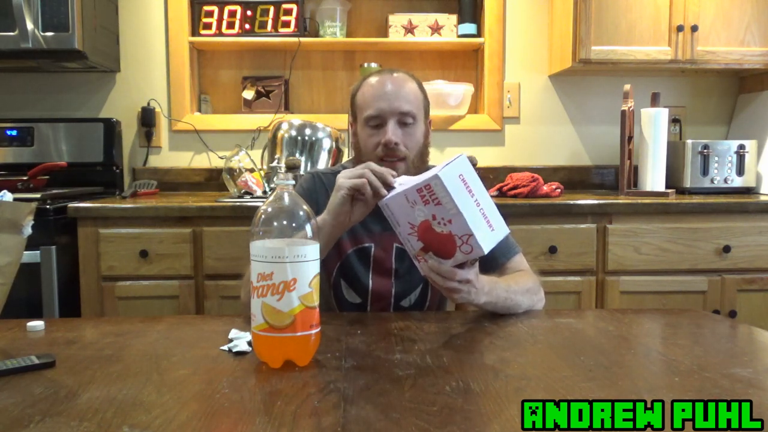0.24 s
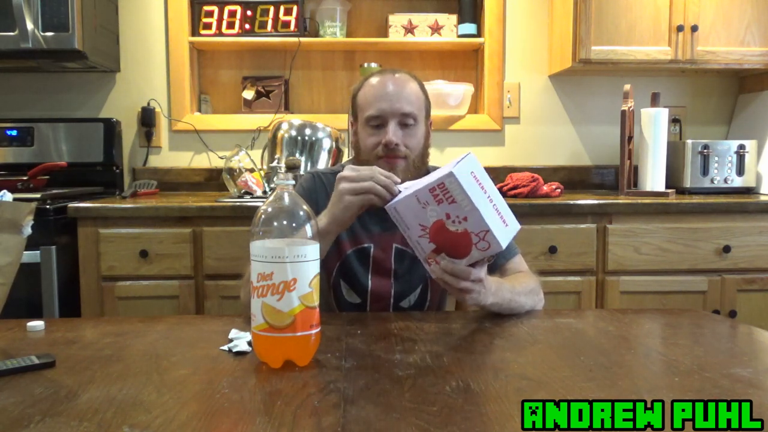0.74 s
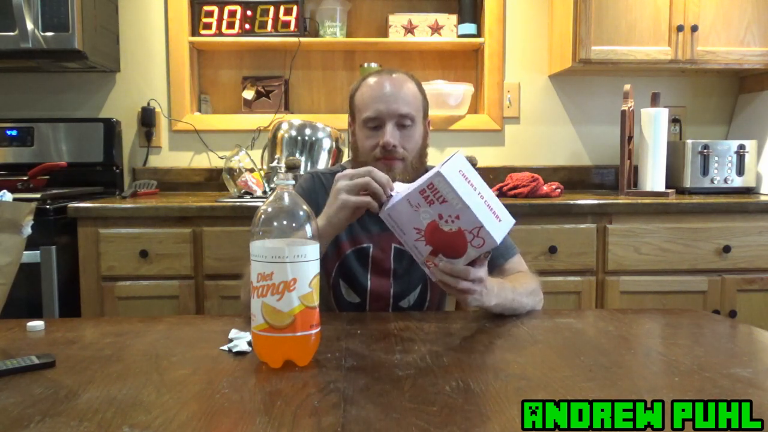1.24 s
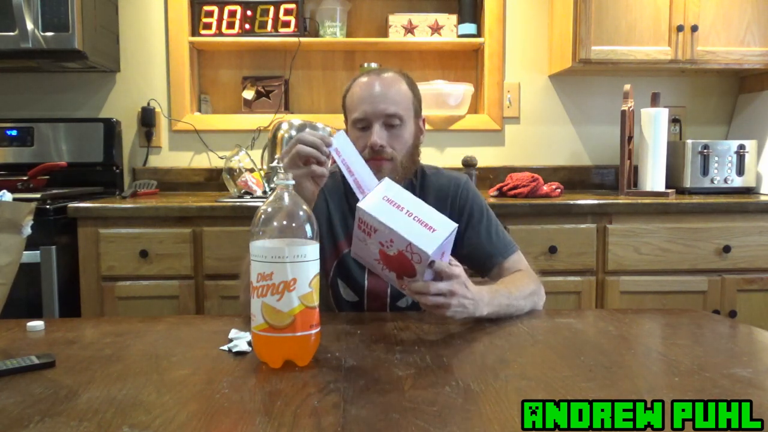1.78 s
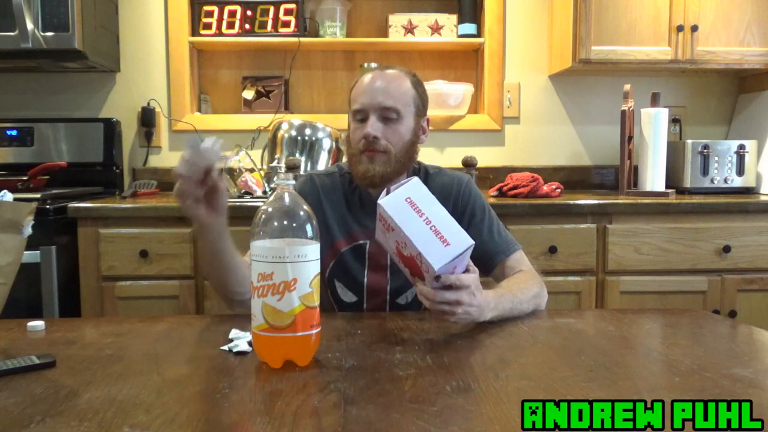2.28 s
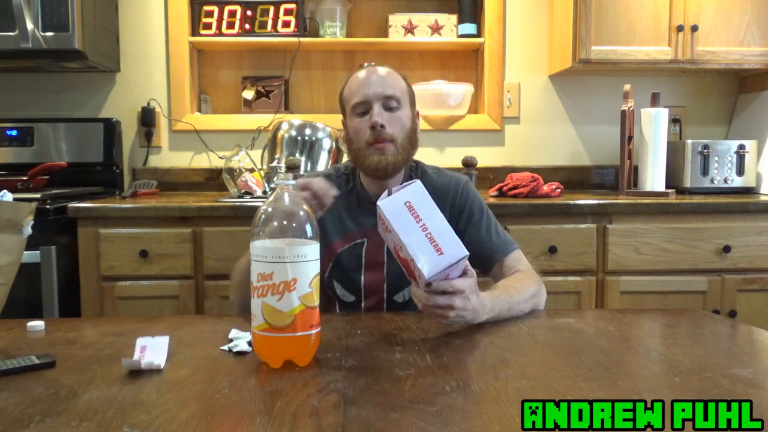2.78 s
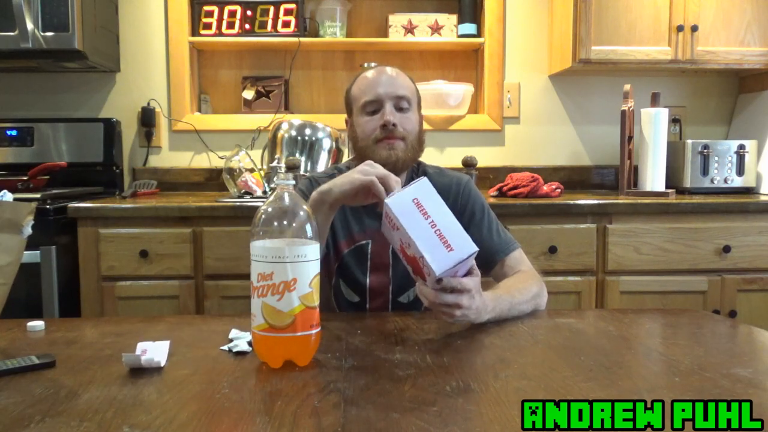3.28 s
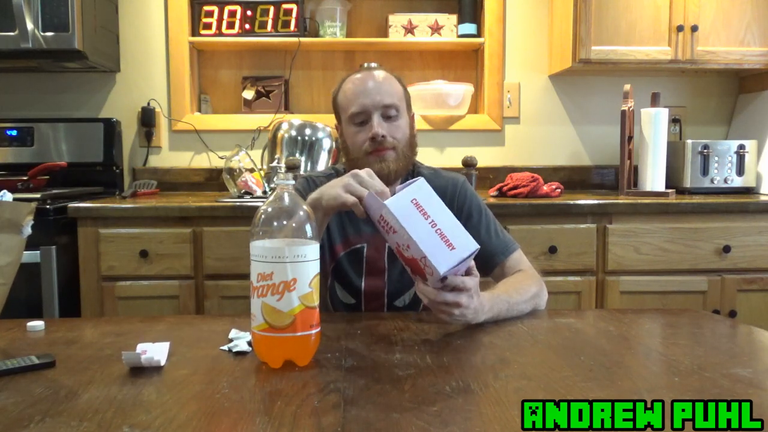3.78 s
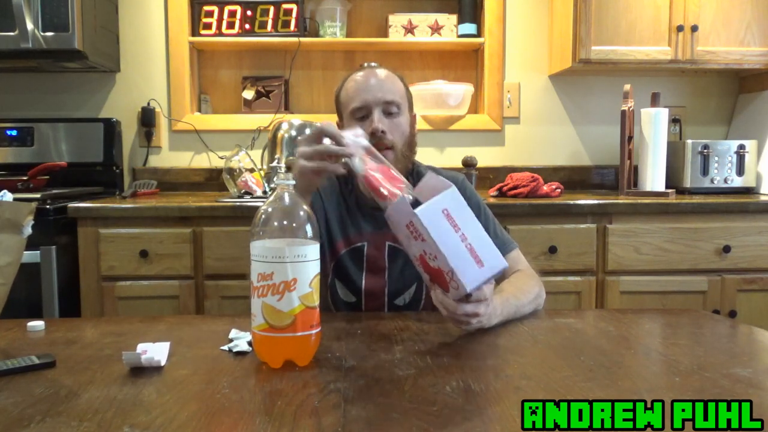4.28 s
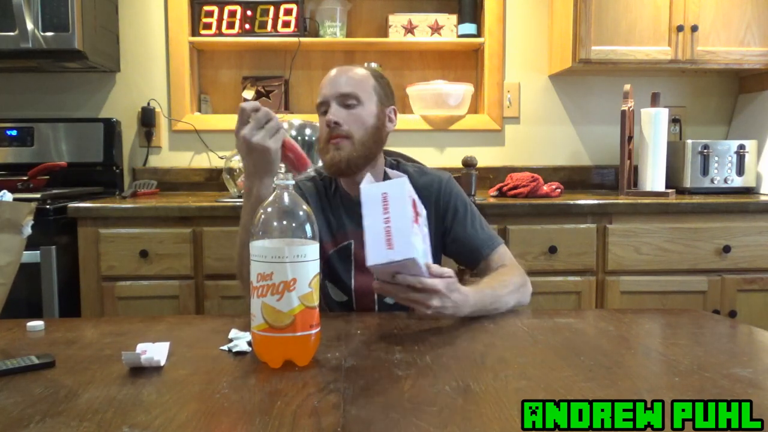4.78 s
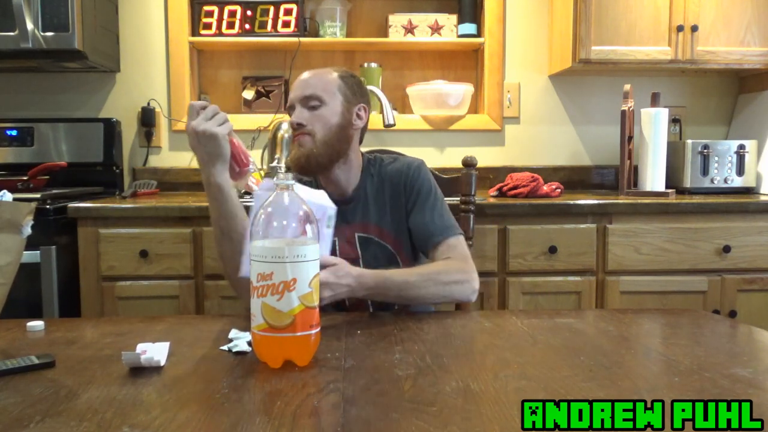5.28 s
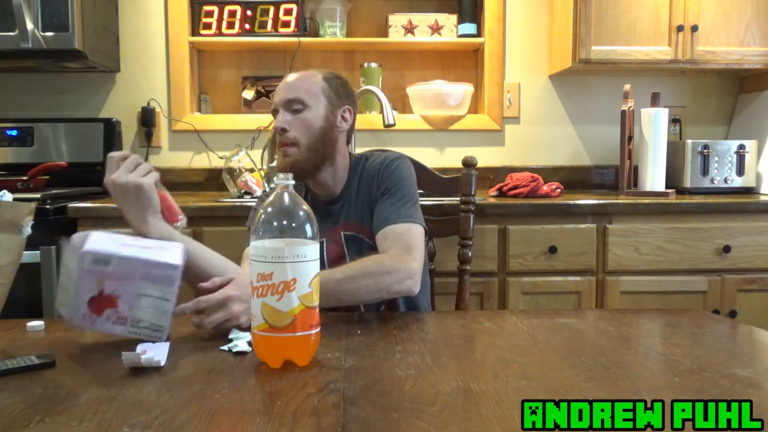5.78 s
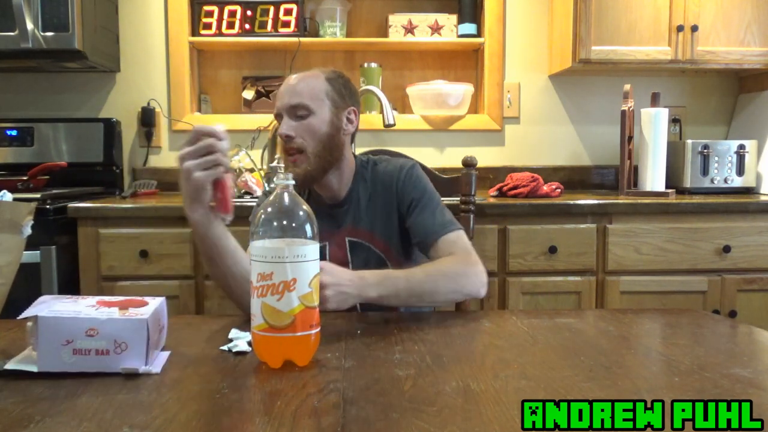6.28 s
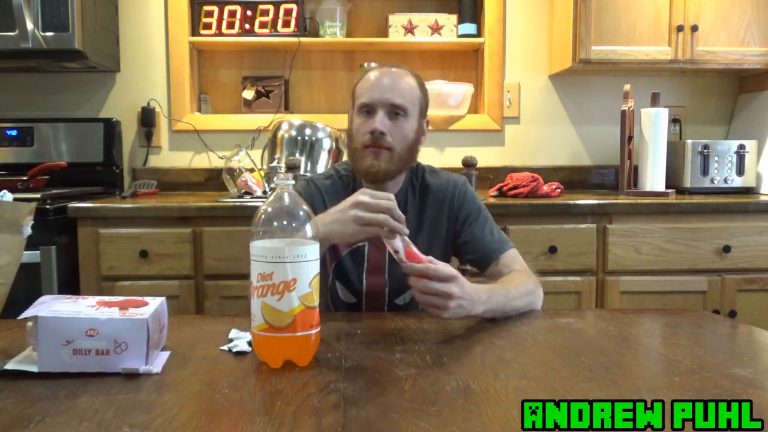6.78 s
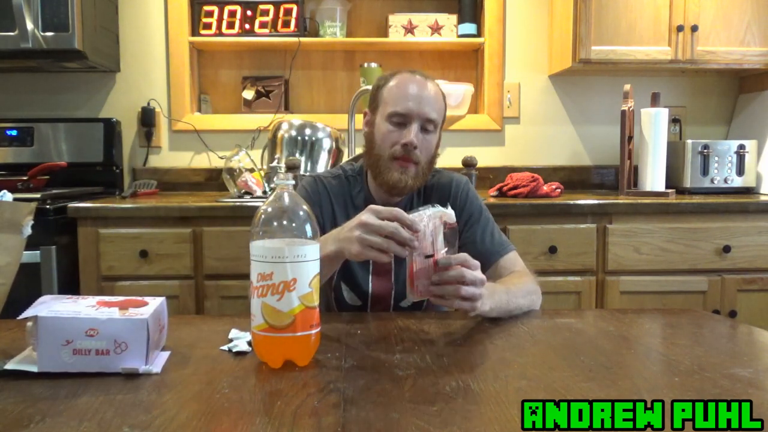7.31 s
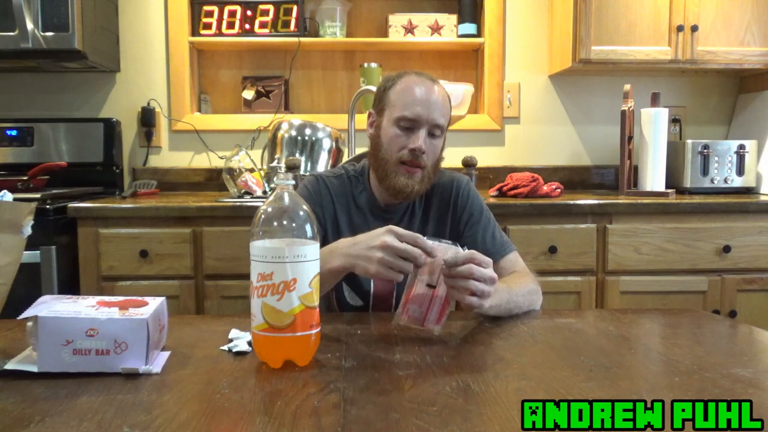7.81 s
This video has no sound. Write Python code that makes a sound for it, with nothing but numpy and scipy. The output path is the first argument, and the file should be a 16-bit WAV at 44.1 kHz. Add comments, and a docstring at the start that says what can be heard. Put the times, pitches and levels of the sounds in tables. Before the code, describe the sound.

In a small hard kitchen, fingers scratch at a hollow cardboard box; a tab snaps woodily, then a tear strip rips away in rapid pops and rasping fibres. After a quiet pause a thin plastic wrapper slides out crackling. The box knocks and rattles onto the table slightly left, then the wrapper crinkles briskly until the end. Close, nearly mono microphone, low steady murmur beneath.

```python
"""A thin plastic wrapper crinkles in the fingers: squeezes swell a shower of small folds, big creases snap.
Before that a cardboard box is picked at: a tab snaps, then its perforated tear strip rips off with hollow
pops and rasping fibres. Later the box lands on the table as the wrapper goes on crinkling. Noise bursts
make the cracks, struck modes the panels and table, dense random fractures the friction and folds.
A small hard room answers, nearly mono, over a steady murmur."""
import sys
import numpy as np
from scipy import signal
from scipy.fft import rfft, irfft, next_fast_len
from scipy.io import wavfile
from scipy.ndimage import uniform_filter1d, minimum_filter1d

SR = 44100
rng = np.random.default_rng(int(sys.argv[2]) if len(sys.argv) > 2 else 0)


def to_wav(s):
    """Save 16-bit WAV."""
    ch = np.atleast_2d(s).T  # columns
    pcm = np.round(np.clip(ch, -1, 1) * 32767)  # PCM
    wavfile.write(sys.argv[1], SR, pcm.astype(np.int16))


N = 355005

# big creases of the wrapper snapping through: (t/s, relative level/dB)
CREASE_SNAPS = [(3.8057, -19), (3.874, -18), (3.903, -14), (3.9203, -12.5), (4.0669, -12), (4.2818, 4.5),
                (4.3515, -3), (4.4256, -9.5), (4.4712, -5.5), (4.4973, -10), (4.5104, -9), (4.5517, -2.5),
                (4.5842, -8.5), (4.629, -10), (4.6467, -8), (4.655, -7), (4.6823, -7.5), (4.763, -10.5),
                (4.771, -12.5), (4.9222, -8.5), (4.975, -19), (5.3226, -23), (6.4665, -17), (6.595, -11),
                (6.612, -13.5), (6.6266, -5.5), (6.6567, -9.5), (6.6818, -5), (6.714, -14), (6.7629, -11),
                (6.7821, -6), (6.8079, -10), (6.8486, -5), (6.8782, -11), (6.891, -14), (6.8982, -6.5),
                (6.9648, -9.5), (6.976, -19), (6.991, -13), (7.055, -10), (7.105, -17), (7.2803, -16.5),
                (7.3554, -2.5), (7.3796, -11.5), (7.441, -7.5), (7.4775, -9.5), (7.5208, -4), (7.6126, -17),
                (7.653, -17), (7.6858, -8.5), (7.7888, -9.5), (7.836, -8.5), (7.9243, -6), (7.9508, -7.5),
                (7.9706, -8.5)]
# colour of the hollow box: (f/Hz, gain/dB)
HOLLOW_COLOUR = [(35, -44), (80, -28), (160, -20), (280, -12), (480, -8.5), (700, -3), (900, -7.5),
                 (1300, -9.5), (2300, -11), (4000, -59)]
# colour of cracking and rasping paper fibres: (f/Hz, gain/dB)
FIBRE_COLOUR = [(100, -71), (500, -23), (1400, -5), (2500, 4), (4000, -0.5), (6000, 2), (9000, -3.5),
                (11000, -11.5), (15500, -27)]
# colour of the thin plastic film: (f/Hz, gain/dB)
FILM_COLOUR = [(60, -80), (120, -16.5), (300, -1), (800, -2), (1600, 1), (2500, 0), (4600, 1), (6400, 1.5),
               (9400, 1.5), (10800, -5), (14500, -9.5), (16000, -17)]
CREASE_HZ = 6070  # typical pitch of a crease
HELD_FROM, HELD_TO = 3.8, 8.05  # s, the wrapped treat is in the hand


def amp(db):
    """Decibels to gain."""
    return 10 ** (np.asarray(db) / 20)


def unit(x):
    """Scale to rms 1."""
    return x / np.sqrt(np.mean(x ** 2) + 1e-20)


def crest(x):
    """Scale to peak 1."""
    return x / np.abs(x).max()


def along(points, hz):
    """Read (f/Hz, value) points on a log frequency axis."""
    f, v = np.transpose(points)
    return np.interp(np.log(hz + 1), np.log(f), v)


def swell(s, db):
    """A level curve as a gain per sample, 120 dB down outside its span."""
    return amp(np.interp(np.arange(N) / SR, s, db, left=-120, right=-120))


def add(track, s, sound):
    """Mix a sound into a track at time s."""
    part = track[max(round(s * SR), 0):][:len(sound)]
    part += sound[:len(part)]


def colour(x, spectrum, size=8192):
    """Causal minimum-phase filter with the gain of (f/Hz, gain/dB) points."""
    gain = amp(along(spectrum, np.fft.rfftfreq(size, 1 / SR)))
    cepstrum = irfft(np.log(gain + 1e-6))
    # folding the cepstrum forward in time makes the filter causal
    cepstrum[1:size // 2] *= 2
    cepstrum[size // 2 + 1:] = 0
    return signal.fftconvolve(x, irfft(np.exp(rfft(cepstrum))))[:len(x)]


def burst(t60, size=2048):
    """A puff of noise that decays by 60 dB in t60 seconds."""
    return rng.standard_normal(size) * np.exp(-np.log(1000) * np.arange(size) / SR / t60)


def resonate(x, hz, width_hz):
    """One resonance with gain 1 at its centre."""
    b, a = signal.iirpeak(min(hz, SR / 2 - 2000), hz / min(width_hz, SR / 4), SR)
    return signal.lfilter(b, a, x)


def ring(modes, scatter, size=4096):
    """Struck modes (f/Hz, width/Hz, level/dB), peak 1; pitch and balance shift from blow to blow."""
    t = np.arange(size) / SR
    swing = np.zeros(size)
    for k, (hz, width, db) in enumerate(modes):
        level = amp(db + 2 * rng.normal()) / hz
        pitch = hz * np.exp(scatter * rng.normal())
        swing += level * np.exp(-np.pi * width * t) * (-1) ** k * np.sin(2 * np.pi * pitch * t)
    onset = 1 - np.exp(-t / 0.000074)
    return crest(np.gradient(swing * onset))  # a small panel radiates no bass


def crackle(rate, spread_db, t60, pitch_hz, count=6):
    """Random tiny fractures of many sizes and pitches, each a dying puff; the overall level is evened out."""
    out = np.zeros(N)
    fade = np.exp(-2 * np.log(1000) / SR / t60)  # power decay per sample
    for hz in pitch_hz * np.geomspace(.5, 2, count):
        chance = rng.random(N) * count * SR / rate  # below 1: a fracture starts here
        sizes = (chance < 1) * amp(spread_db * np.minimum(-np.log(chance + 1e-12), 3))
        envelope = np.sqrt(signal.lfilter([1], [1, -fade], sizes ** 2 + 1e-9))
        noise = rng.standard_normal(N)
        out += envelope * (noise + 2 * resonate(noise, hz, hz / 2))
    local_power = np.abs(uniform_filter1d(out ** 2, size=1400))
    return out / np.sqrt(local_power + np.mean(out ** 2) / 20)


def room_tone(level_db=-59, side_db=-13):
    """Steady appliance murmur and microphone hiss as coloured noise, mostly in the middle."""
    # murmur and hiss colour: (f/Hz, gain/dB)
    murmur_colour = [(12, -28), (20, -2), (48, -5.5), (60, -13), (81, -1.5), (142, -3.5), (234, -1),
                     (513, -6.5), (738, -7), (1710, -11.5), (2530, -12), (7310, -19.5), (7950, -17.5),
                     (10500, -23), (16000, -26)]
    mid, side = (unit(colour(rng.standard_normal(N), murmur_colour)) for _ in range(2))
    side = amp(side_db) * side
    return amp(level_db) * np.array([mid + side, mid - side])


def fingertips(rate=22, tick_db=-46, spread_db=3, hollow_db=7, tick_t60=0.036):
    """Fingertips shift on the card: faint, uneven scratches heard through fibre and hollow box."""
    # fingers busy on the card: (from t/s, to t/s)
    picking_spans = [(0.02, 1.14), (2.05, 2.72), (3.1, 3.5)]
    touches = np.zeros(N)
    for start, stop in picking_spans:
        draws = rng.standard_normal((int((stop - start) * rate), 2))
        for k, (slip, size) in enumerate(draws):
            tick = amp(tick_db + spread_db * size) * crest(burst(tick_t60))
            add(touches, start + (k + slip / 2) / rate, tick)
    return colour(touches, FIBRE_COLOUR) + amp(hollow_db) * colour(touches, HOLLOW_COLOUR)


def card_pops(flap_db=-9, flap_share=0.61, crack_db=13, crack_t60=0.014,
              lead=0.0055, linger=0.002, offset=0.0015):
    """Each tap or bursting perforation crushes fibres, cracks, flicks the flap and rings the hollow box."""
    # taps and bursts: (t/s, hollow pop peak level/dB, fibre crush peak level/dB)
    pops = [(0.074, -31, -40), (0.347, -43, -30.5), (0.374, -35, -41), (0.627, -42.5, -52),
            (0.71, -35, -49), (0.817, -41.5, -50), (0.924, -32.5, -53), (0.943, -29.5, -52),
            (0.966, -36, -52.5), (1.077, -40, -61), (1.442, -16, -26), (1.484, -16.5, -23.5),
            (1.527, -18, -30.5), (1.553, -16.5, -23.5), (1.587, -13, -21.5), (1.612, -21, -23.5),
            (1.639, -14, -24), (1.67, -17.5, -24.5), (1.7, -19, -24), (1.755, -18.5, -26),
            (1.837, -16.5, -27), (1.9, -16, -20), (1.932, -20, -19), (1.955, -13.5, -25.5),
            (2.578, -38.5, -36.5), (3.19, -26.5, -44.5), (3.28, -30.5, -51), (3.53, -41, -52)]
    # box panels: (f/Hz, width/Hz, level/dB)
    box_modes = [(268, 83, -11.5), (351, 105, -5.5), (536, 210, 0.5), (723, 78, -1), (975, 107, -7)]
    # stiff flap edges: (f/Hz, width/Hz, level/dB)
    flap_modes = [(1090, 210, -10), (1450, 380, 4), (1670, 210, -13), (2380, 640, 4.5), (2700, 660, -13)]
    out = np.zeros(N)
    t = np.arange(-SR // 50, SR // 20) / SR
    crush_shape = np.exp(np.minimum(t / lead, -t / linger))
    for s, pop, crush_level in pops:
        s += offset  # small shared time offset; crush, pop and crack peak together
        crack_level = crush_level + crack_db
        crush = colour(rng.standard_normal(len(t)) * crush_shape, FIBRE_COLOUR)
        add(out, s + t[0], amp(crush_level) * crest(crush))
        add(out, s, amp(pop) * ring(box_modes, scatter=0.079))
        flick = pop + flap_db + flap_share * (crack_level - pop)  # sharper cracks flick it harder
        add(out, s, amp(flick) * ring(flap_modes, scatter=0.16))
        add(out, s, amp(crack_level) * crest(colour(burst(crack_t60), FIBRE_COLOUR)))
    return out


def tab_break(s=.2342, db=-6, crack_db=-17):
    """The end of the tear strip is pressed in: a faint tick, then one loud, woody snap of modes and fibre."""
    # the breaking tab: (f/Hz, width/Hz, level/dB)
    tab_modes = [(300, 110, -17.5), (607, 170, -1), (746, 176, 2), (1020, 160, -0.5), (1225, 280, 1),
                 (1560, 150, -4), (1780, 400, 0.5), (2320, 440, 1.5), (3860, 1000, 2)]
    out = np.zeros(N)
    add(out, .2185, amp(-25) * crest(colour(burst(t60=.008), FIBRE_COLOUR)))
    add(out, s, amp(db) * ring(tab_modes, scatter=0.023))
    add(out, s, amp(crack_db) * crest(colour(burst(t60=0.024), FIBRE_COLOUR)))
    return out


def card_friction(tear_hollow_db=-1, scuff_fibre_db=-0.5):
    """Dense slips drone in the box while the paper fibres rasp: one long tear and many short scuffs."""
    # the strip lifted, then ripping: (t/s, hollow level/dB before trim, fibre level/dB)
    tear_curve = [(1.34, -61, -59), (1.39, -60, -49.5), (1.43, -58, -54), (1.494, -55, -45),
                  (1.56, -42, -34), (1.616, -34.5, -42), (1.766, -49, -37), (1.835, -53, -40.5),
                  (1.9, -37, -27), (1.98, -37, -43.5), (2.04, -62, -49)]
    # fingers and wrapped treats sliding on card: (strongest t/s, half length/s, level/dB before fibre trim)
    scuffs = [(0.483, 0.036, -52.5), (0.773, 0.25, -60.5), (3.219, 0.034, -57), (3.328, 0.023, -53.5),
              (3.618, 0.18, -56.5), (3.692, 0.039, -49), (3.927, 0.22, -48), (4.097, 0.031, -36.5),
              (4.264, 0.19, -37.5), (4.837, 0.12, -50.5), (5.028, 0.11, -49), (5.19, 0.085, -49),
              (5.388, 0.09, -47), (5.57, 0.18, -43.5), (5.904, 0.065, -44), (6.368, 0.038, -40)]
    s, hollow_db, fibre_db = np.transpose(tear_curve)
    hollow = swell(s, hollow_db + tear_hollow_db)
    fibre = swell(s, fibre_db)
    for s, half_length, db in scuffs:
        stroke = amp(db) * np.hanning(round(2 * half_length * SR))
        add(hollow, s - half_length, stroke)
        add(fibre, s - half_length, amp(scuff_fibre_db) * stroke)
    drone = unit(colour(crackle(rate=1200, spread_db=6.0, t60=0.01, pitch_hz=720), HOLLOW_COLOUR))
    rasp = unit(colour(crackle(rate=2100, spread_db=6, t60=0.0061, pitch_hz=5550), FIBRE_COLOUR))
    return hollow * drone + fibre * rasp


def edge_pings():
    """A stiff edge of card or film slips free and rings as two close modes, heard as one pitch."""
    # edges flicking free: (t/s, peak level/dB, f/Hz, twice the mode width/Hz)
    pings = [(1.8025, -9.5, 5670, 1500), (2.142, -28, 5380, 3000), (2.172, -36.5, 6500, 2000),
             (5.799, -17, 3760, 700)]
    out = np.zeros(N)
    for s, db, hz, width in pings:
        modes = [(hz, width / 2, 0), (hz * 1.015, width / 2, -3)]
        add(out, s, amp(db) * ring(modes, scatter=.01))
    return out


def table_shudder():
    """The table shakes under leaning arms or the settling box: swells of deep noise."""
    # rumbles: (strongest t/s, half length/s, level/dB)
    shudders = [(2.0, 0.08, -57), (3.35, 0.05, -59), (6.17, 0.083, -43), (7.25, 0.66, -63.5)]
    # rumble colour: (f/Hz, gain/dB)
    deep_colour = [(15, -12), (30, -3), (55, -10), (90, 0.5), (140, -6), (300, -48)]
    shake = np.zeros(N)
    for s, half_length, db in shudders:
        add(shake, s - half_length, amp(db) * np.hanning(round(2 * half_length * SR)))
    return shake * unit(colour(rng.standard_normal(N), deep_colour))


def creak(creak_db=-1):
    """A brief low creak as the arm swings away with the strip: quick slips each ring woody modes."""
    # slips: (t/s, peak level/dB before trim)
    slips = [(2.2327, -33.5), (2.237, -35), (2.243, -31), (2.2489, -29), (2.256, -34), (2.26, -46)]
    # creaking wood: (f/Hz, width/Hz, level/dB)
    wood_modes = [(174, 98, 3), (264, 74, 9.5), (480, 150, -5), (1180, 86, -9), (1700, 43, -2.5),
                  (1860, 130, -2)]
    out = np.zeros(N)
    for s, db in slips:
        add(out, s, amp(db + creak_db) * ring(wood_modes, scatter=0.033))
    return out


def table_thumps():
    """The table top booms briefly under each heavy contact."""
    # a forearm or the box meeting the table: (t/s, peak level/dB)
    thumps = [(3.207, -39.5), (5.682, -18), (5.945, -22.5), (6.112, -18)]
    # the table top: (f/Hz, width/Hz, level/dB)
    tabletop_modes = [(96, 18, -21), (163, 35, -1), (243, 110, 9), (412, 46, 2)]
    out = np.zeros(N)
    for s, db in thumps:
        add(out, s, amp(db) * ring(tabletop_modes, scatter=0.028, size=8192))
    return out


def grip(held_db=-55):
    """How hard the wrapper is worked, as a gain: each squeeze builds and lets go; held, it never quite rests."""
    # squeezes of the wrapper: (tightest t/s, build and release time constant/s, relative level/dB)
    squeezes = [(3.935, 0.024, -31.5), (4.007, 0.0065, -26), (4.1, 0.017, -26), (4.265, 0.062, -20),
                (4.333, 0.03, -18.5), (4.5, 0.068, -28.5), (4.64, 0.042, -30), (4.79, 0.05, -30.5),
                (4.97, 0.072, -36), (5.64, 0.093, -35.5), (6.12, 0.073, -30), (6.45, 0.1, -40.5),
                (6.64, 0.035, -30.5), (6.792, 0.022, -24.5), (6.89, 0.13, -29), (7.178, 0.0054, -23.5),
                (7.26, 0.0083, -33), (7.361, 0.011, -27), (7.48, 0.018, -20), (7.8, 0.094, -25.5),
                (7.97, 0.068, -22.5)]
    t = np.arange(N) / SR
    power = swell([HELD_FROM, HELD_TO], [held_db, held_db]) ** 2
    for s, release, db in squeezes:
        power += (amp(db) * np.exp(-np.abs(t - s) / release)) ** 2
    return np.sqrt(power)


def small_folds(effort, crinkle_db=-4, follow_db=-23, lead=0.0026, linger=0.0073):
    """A dense shower of small folds follows the grip; each big crease has a short avalanche around it."""
    folds = amp(crinkle_db) * effort
    t = np.arange(-SR // 20, SR // 10) / SR
    avalanche = np.exp(np.minimum(t / lead, -t / linger))
    for s, db in CREASE_SNAPS:
        add(folds, s + t[0], amp(db + follow_db) * avalanche)
    shower = crackle(rate=650, spread_db=7.0, t60=0.0038, pitch_hz=4750, count=8)
    return folds * unit(colour(shower, FILM_COLOUR))


def lesser_creases(effort, rate=50, tick_db=11, spread_db=3, tick_t60=0.0059,
                   sharpness=0.81, broad=0.34, scatter=0.26):
    """Middling creases tick at uneven intervals, their level following the grip."""
    out = np.zeros(N)
    draws = rng.standard_normal((int((HELD_TO - HELD_FROM) * rate), 3))
    for k, (slip, size, pitch) in enumerate(draws):
        s = HELD_FROM + (k + slip / 2) / rate
        hz = CREASE_HZ * np.exp(scatter * pitch)
        kick = burst(tick_t60, size=512)
        tick = crest(resonate(kick, hz, hz / sharpness) + broad * kick)
        add(out, s, amp(tick_db + spread_db * size) * tick)
    return colour(effort * out, FILM_COLOUR)


def creases(snap_db=9, click_db=7, snap_t60=0.0078, sharpness=1.05, broad=0.19,
            scatter=0.13, rise=0.0004, offset=0.000992):
    """Big creases snap through: one hard click at the facet's own pitch, then a brief flutter."""
    out = np.zeros(N)
    for s, db in CREASE_SNAPS:
        hz = CREASE_HZ * np.exp(scatter * rng.normal())
        kick = burst(snap_t60 * 5000 / hz)  # small, high facets stop sooner
        kick *= 1 - np.exp(-np.arange(len(kick)) / SR / rise)
        kick[0] = amp(click_db)
        facet = resonate(resonate(kick, hz, hz / sharpness), hz, hz * 3)
        snap = colour(facet + broad * kick, FILM_COLOUR)
        add(out, s + offset, amp(db + snap_db) * snap / np.linalg.norm(snap))  # level sets its energy
    return out


def top_level(x, split_hz=9500):
    """The wrapper's highest treble brightens and dulls over time, following a level curve."""
    # the wrapper's treble level, duller around 6 s, brighter before and after: (t/s, gain/dB above the split)
    treble_curve = [(3.8, -6), (4.3, -2), (4.65, -1.5), (4.9, -2), (5.7, -9), (6.3, -11), (6.7, -4),
                    (8.05, -3.5)]
    highpass = signal.butter(2, split_hz, "highpass", fs=SR, output="sos")
    top = signal.sosfiltfilt(highpass, x)
    top_gain = amp(np.interp(np.arange(N) / SR, *np.transpose(treble_curve)))
    return x + top * (top_gain - 1)


def box_landing(thump_hz=330, rattle_hz=2200):
    """The full box hits, skids and settles on the table: dense knocks as the wrapped treats jostle inside."""
    # landings: (t/s, level/dB, rise time constant/s, t60/s, thump gain/dB, rattle gain/dB)
    landings = [(5.677, -20.5, 0.0027, 0.45, 5, 2), (5.939, -13, 0.033, 0.25, -3.5, 0),
                (6.085, -7.5, 0.03, 0.23, 0.5, -3.5), (6.189, -24, 0.003, 0.21, -11, 4.5)]
    # box against table: (f/Hz, gain/dB)
    table_colour = [(26, -57), (45, -57), (91, -10), (134, -18), (247, -1.5), (292, -6), (487, 0),
                    (773, -3), (1030, -3), (1350, -8), (2250, -7), (3490, -9), (7230, -7.5), (9000, -12.5),
                    (15000, -43)]
    out = np.zeros(N)
    t = np.arange(SR // 2) / SR
    jostle = colour(crackle(rate=1400, spread_db=1.5, t60=0.0023, pitch_hz=1250), table_colour)
    for s, db, rise, t60, thump_db, rattle_db in landings:
        tilt = [(thump_hz, thump_db), (800, 0), (rattle_hz, rattle_db)]
        body = unit(colour(jostle[round(s * SR):][:len(t)], tilt))
        envelope = (1 - np.exp(-t / rise)) * np.exp(-np.log(1000) * t / t60)
        add(out, s, amp(db) * body * envelope)
    return out


def room_tail():
    """A diffuse answer of energy 1 that starts after the first reflection off the table."""
    # decay of the small hard kitchen: (f/Hz, t60/s)
    kitchen_decay = [(150, 0.5), (400, 0.32), (1000, 0.3), (2800, 0.27), (7300, 0.2), (15000, 0.2)]
    hz, t, z = signal.stft(rng.standard_normal(SR // 2), SR, nperseg=256)
    decay = np.exp(-np.log(1000) * t / along(kitchen_decay, hz)[:, None])
    tail = signal.istft(z * decay, SR, nperseg=256)[1]
    tail *= np.clip(np.arange(len(tail)) / SR / 0.00046 - 1, 0, 1)
    return tail / np.linalg.norm(tail)


def in_kitchen(x, wet_db, left_db, size=8192):
    """Direct sound plus a diffuse room answer, drawn afresh for each block so no tail colour repeats."""
    # stereo spread of the room answer: (f/Hz, side gain/dB relative to mid)
    side_colour = [(60, -13), (200, -16.5), (1000, -8), (4000, -8.5), (12000, -6)]
    mid, side = np.zeros(N), np.zeros(N)
    for start in range(0, N, size):
        block = x[start:start + size]
        add(mid, start / SR, signal.fftconvolve(block, room_tail()))
        add(side, start / SR, signal.fftconvolve(block, room_tail()))
    side = colour(side, side_colour)
    stereo = x + amp(wet_db) * np.array([mid + side, mid - side])
    return stereo * amp([[left_db / 2], [-left_db / 2]])  # left_db: left above right


def scene():
    """Box and wrapper near the middle, the landing a little to the left."""
    effort = grip()
    card = in_kitchen(card_pops() + card_friction() + fingertips() + creak(), wet_db=-4, left_db=0.3)
    tab = in_kitchen(tab_break(), wet_db=-5, left_db=0.0)
    sharp_film = top_level(creases() + lesser_creases(effort))
    snaps = in_kitchen(sharp_film + edge_pings(), wet_db=-9.5, left_db=0.5)
    folds = in_kitchen(top_level(small_folds(effort)), wet_db=-2.0, left_db=-0.3)
    landing = in_kitchen(box_landing() + table_thumps(), wet_db=-5.0, left_db=2.0)
    return card + tab + snaps + folds + landing + table_shudder() + room_tone()


def record(dry, ceiling=0.49, top_hz=16000):
    """A fast stereo-linked limiter holds the sharpest peaks; nothing passes above the band limit."""
    needed = np.minimum(1, ceiling / (np.abs(dry).max(axis=0) + 1e-9))
    held = dry * uniform_filter1d(minimum_filter1d(needed, size=90), size=60)
    size = next_fast_len(N + 4096)  # padding keeps the end from wrapping to the start
    passed = np.fft.rfftfreq(size, 1 / SR) < top_hz
    return irfft(rfft(held, size) * passed, size)[:, :N]


dry = scene()
out = record(dry)
to_wav(out)
```